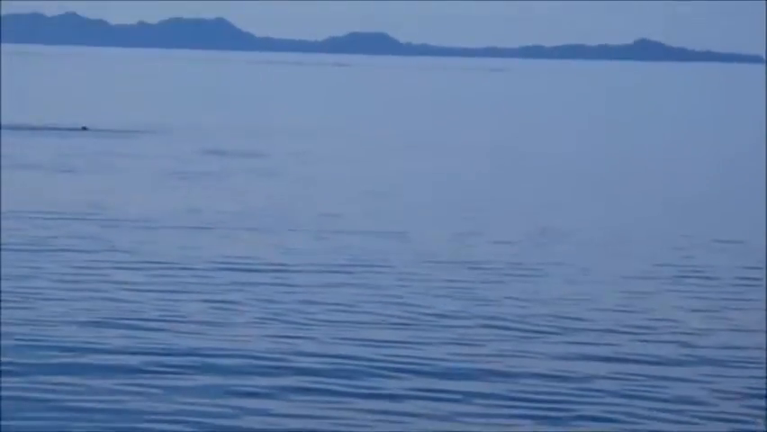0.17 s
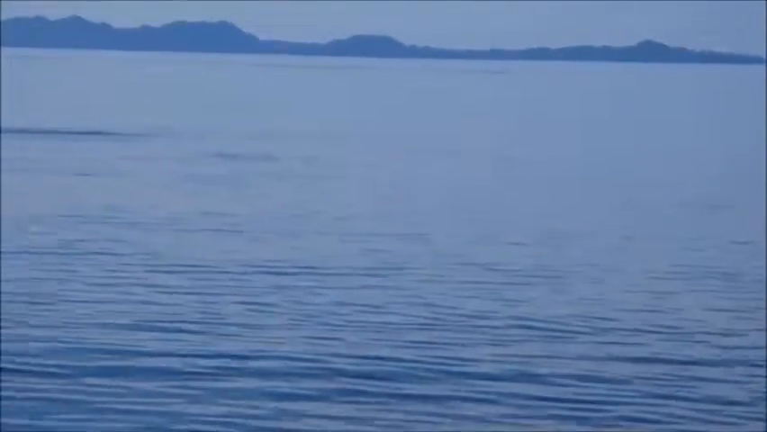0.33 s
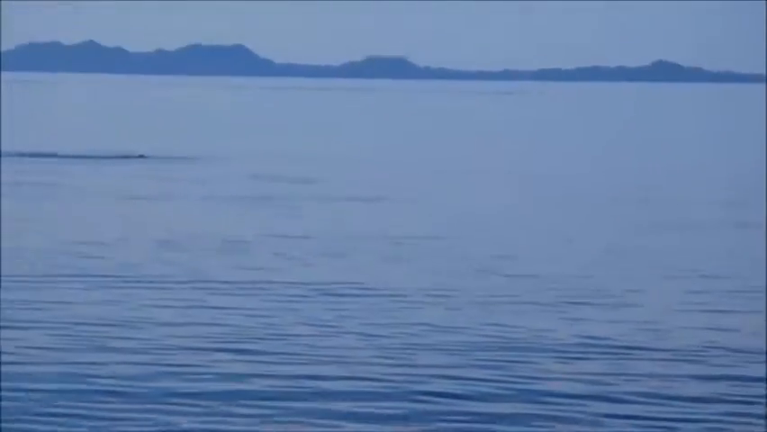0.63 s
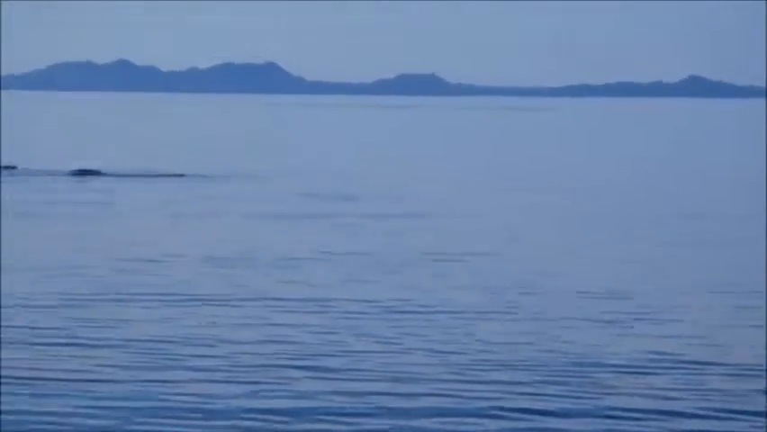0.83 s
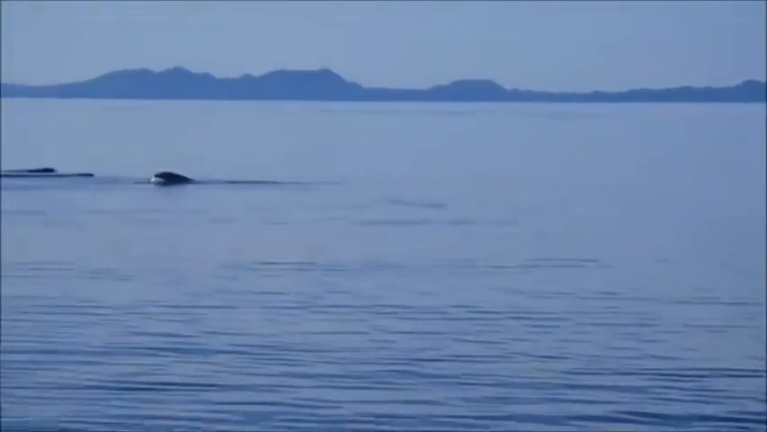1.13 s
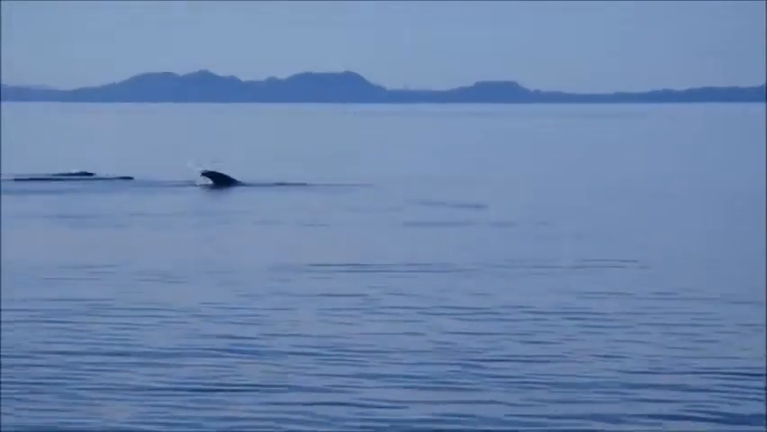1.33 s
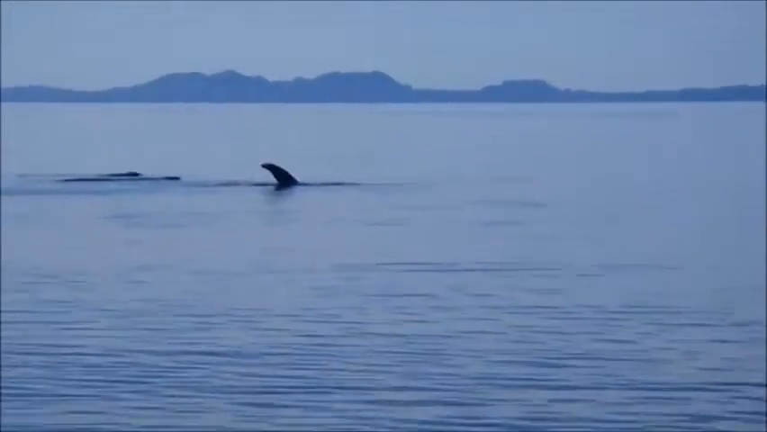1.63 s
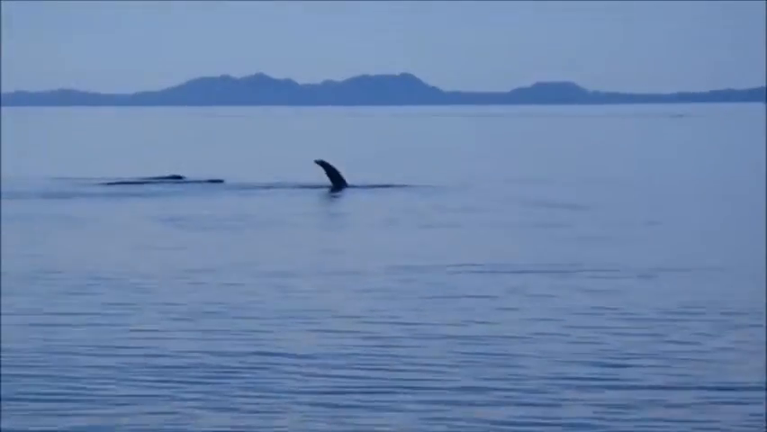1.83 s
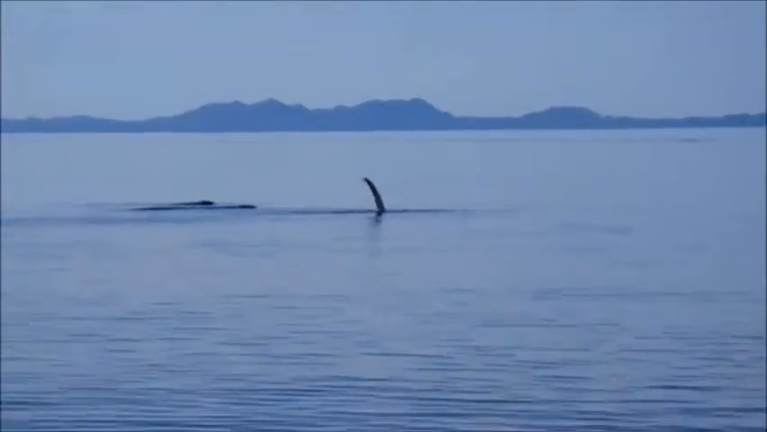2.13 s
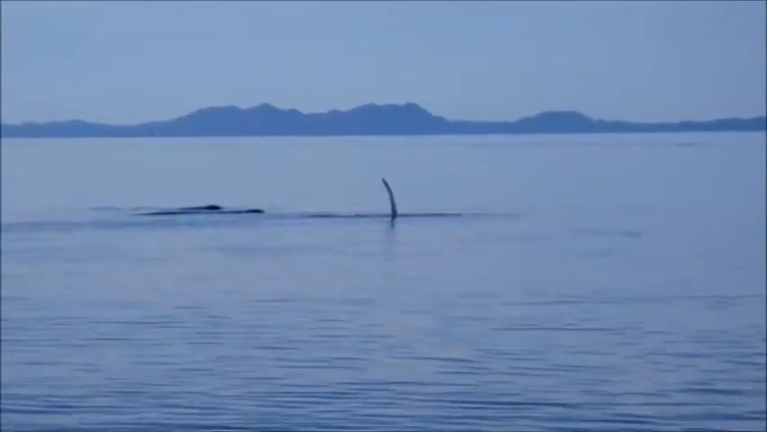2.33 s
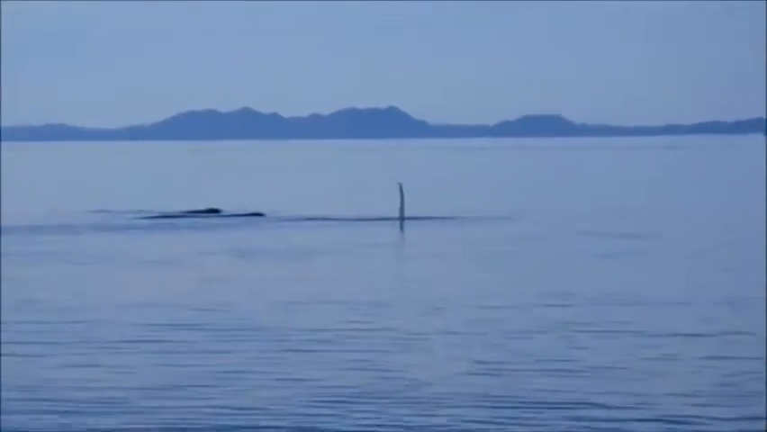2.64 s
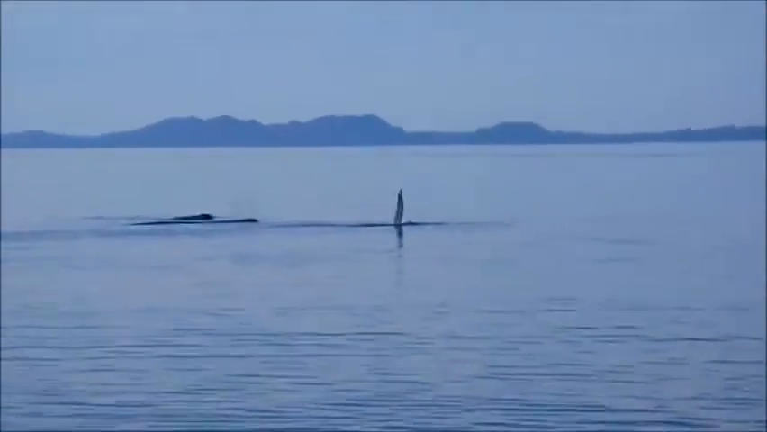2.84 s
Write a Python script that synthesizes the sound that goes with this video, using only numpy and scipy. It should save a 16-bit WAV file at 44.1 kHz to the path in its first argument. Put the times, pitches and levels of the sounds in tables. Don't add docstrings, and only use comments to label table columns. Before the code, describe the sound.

A boat's diesel engine drones low and steady through the hull, with cooling water hissing overboard; wind buffets the microphone early, and a distant whale blows softly at the start and again near the end.

```python
import sys
import numpy as np
from scipy import signal
from scipy.fft import rfft, irfft
from scipy.io import wavfile
from scipy.ndimage import uniform_filter1d, map_coordinates

SR = 44100
rng = np.random.default_rng(int(sys.argv[2]) if len(sys.argv) > 2 else 0)


def materialize(psi):
    bounded = np.clip(np.atleast_2d(psi).T, -1, 1)
    quanta = np.round(bounded * 32767).astype(np.int16)
    wavfile.write(sys.argv[1], SR, quanta)


def attenuation_scalar(level_db):
    decades = np.asarray(level_db, float) / 20
    return 10 ** decades


N = 131859


def curve(table, t):
    return np.interp(t, *np.array(table, float).T)


def level(x, db):
    return x * attenuation_scalar(db) / np.sqrt(np.mean(x ** 2))


def colour(x, shape):
    hz, db = np.array(shape, float).T
    f = np.arange(len(x) // 2 + 1) * SR / len(x) + 1
    octaves_outside = np.log2(np.maximum(hz[0] / f, 1) * np.maximum(f / hz[-1], 1))
    gain_db = np.interp(np.log(f), np.log(hz), db) - 13.7 * octaves_outside
    return irfft(rfft(x) * attenuation_scalar(gain_db), len(x))


def band(x, hz, width_hz):
    return signal.lfilter(*signal.iirpeak(hz, hz / width_hz, fs=SR), x)


def walk(rate):
    hold = int(SR / rate)
    steps = np.repeat(rng.standard_normal(99), hold)
    return 1.32 * uniform_filter1d(uniform_filter1d(steps, hold), hold)[:N]


# (multiple of the cycle [-], rms level [dB])
FIRING_ORDERS = [(6, -34.3), (9, -44), (12, -35.7), (15, -54), (18, -53)]


def firing_orders(phase):
    lag_rad, start_rad, flip_order = 0.18, 2.2, 13
    out = 0
    for order, db in FIRING_ORDERS:
        flip = np.pi * (order > flip_order)
        tone = np.cos(order * (phase - lag_rad) + start_rad + flip)
        out = out + attenuation_scalar(db + 0.74 * walk(12)) * tone
    return np.sqrt(2) * out


# (multiple of the cycle [-], rms level [dB])
GEAR_ORDERS = [(8, -57), (10, -67), (11, -50.5), (13, -62), (17, -60), (20, -60), (21, -64), (22, -59),
               (23, -58), (30, -59.5), (36, -57.5), (39, -54), (60, -66.5), (62, -59), (68, -67.5),
               (74, -63), (89, -64.5), (96, -64.5), (147, -67.5)]


def gear_orders(phase):
    slack_rad, wobble_db = 0.0053, 2.5
    out = 0
    for order, db in GEAR_ORDERS:
        strength = attenuation_scalar(db + wobble_db * walk(5.93))
        loose_phase = phase + slack_rad * walk(9.2)
        out = out + strength * np.cos(order * loose_phase + 7 * rng.random())
    return np.sqrt(2) * out


# (frequency [Hz], level [dB])
CLATTER_SPECTRUM = [(110, -31), (200, -0.5), (350, -2), (450, -7), (850, -6), (1300, -9.5), (1700, -14.5),
                    (3000, -43)]


def clatter(phase, cycle_hz):
    size = int(SR / cycle_hz)
    loop = level(colour(rng.standard_normal(size), CLATTER_SPECTRUM), -49.5)
    position = phase / (2 * np.pi) * size % size
    return map_coordinates(loop, [position], mode="grid-wrap")


# (frequency [Hz], level [dB])
ROAR_SPECTRUM = [(25, 0.5), (60, 1.5), (200, -7), (350, -7.5), (450, -13), (900, -14.5), (1400, -16.5),
                 (2500, -21)]


def roar(gate):
    swell = attenuation_scalar(0.7 * walk(8.2))
    return level(colour(rng.standard_normal(N) * gate * swell, ROAR_SPECTRUM), -43)


# (frequency [Hz], width [Hz], rms level [dB])
PANEL_MODES = [(495, 20, -62.5), (817, 67, -67.5), (1216, 43, -62), (1283, 20, -61.5), (1430, 15, -68)]


def panels(gate):
    out = 0
    for hz, width_hz, db in PANEL_MODES:
        out = out + level(band(rng.standard_normal(N) * gate, hz, width_hz), db)
    return out


# (time [s], lead of the cycle [rad])
SPEED_DRIFT = [(0, .05), (1.0, .04), (1.45, .012), (1.9, .033), (2.2, .02), (2.99, .115)]


def engine(t):
    cycle_hz = 8.84833
    phase = 2 * np.pi * cycle_hz * t + curve(SPEED_DRIFT, t)
    gate = 1 + 0.13 * (np.cos(2 * phase) + np.cos(3 * phase + 1)) / 2
    tones = firing_orders(phase) + gear_orders(phase)
    return tones + clatter(phase, cycle_hz) + roar(gate) + panels(gate)


# (frequency [Hz], width [Hz], level [dB])
SPRAY_BANDS = [(3633, 420, 0.5), (3150, 590, -6), (4330, 750, -5.5)]
# (time [s], level [dB])
WATER_FLOW = [(0, -1), (.16, 2), (.25, 0), (.5, .5), (.6, -1), (.7, 2), (.85, -1), (1.05, -1), (1.14, 2),
              (1.3, -1), (1.55, .5), (1.75, -1.5), (1.88, 1), (2.05, 1), (2.13, -1), (2.5, 0), (2.7, -1),
              (2.99, 1)]


def spray(t):
    drops_per_s, spread_db, top_db = 900, 4, 8.5
    out = 0
    for hz, width_hz, db in SPRAY_BANDS:
        size_db = np.minimum(spread_db * rng.exponential(size=N), top_db)
        drops = (rng.random(N) < drops_per_s / SR) * attenuation_scalar(size_db)
        fizz = level(drops * rng.choice([-1, 1], N), -2)
        x = rng.standard_normal(N) + fizz
        one_pass_hz = width_hz * 1.27
        x = band(band(x, hz, one_pass_hz), hz, one_pass_hz)
        out = out + x * attenuation_scalar(db + 0.8 * walk(16))
    return level(out * attenuation_scalar(curve(WATER_FLOW, t)), -50)


# (time [s], level [dB])
WIND_STRENGTH = [(0, -56), (.1, -43), (.25, -44), (.45, -48), (.7, -49), (.95, -41), (1.15, -41),
                 (1.4, -46.5), (1.7, -52), (1.9, -43.5), (2.05, -48), (2.6, -63), (2.99, -64)]
# (time [s], peak level [dB], frequency [Hz], length [cycles])
WIND_BUFFETS = [(.094, -27, 110, 1.8), (.314, -31, 110, 1.3), (.383, -22, 140, 1.0), (.563, -25, 66, 2.8),
                (.5825, -29, 190, 1.2), (.712, -33, 170, 1.2), (.842, -33, 290, 3.5),
                (.9355, -28, 165, 1.6), (1.027, -29, 58, 2.2), (1.47, -35, 150, 1.6), (1.905, -31, 60, 2.2)]


def wind(t):
    hz, width_hz = 83, 119
    x = rng.standard_normal(N) * attenuation_scalar(3.5 * walk(24.8))
    rumble = band(band(x, hz, width_hz), hz, 3 * width_hz)
    out = level(rumble, 0) * attenuation_scalar(curve(WIND_STRENGTH, t))
    for start, db, buffet_hz, cycles in WIND_BUFFETS:
        age = t - start
        window = np.exp(-(2 * age * buffet_hz / cycles) ** 2)
        out = out - attenuation_scalar(db) * window * np.sin(2 * np.pi * buffet_hz * age)
    return out


# (start [s], length [s], level [dB])
WHALE_BLOWS = [
    (0.05, 0.51, -54.5),
    (2.7, .4, -51),
]
# (frequency [Hz], level [dB])
BLOW_SPECTRUM = [(600, -14), (1500, -3), (2300, -14), (3600, -8), (4600, -14), (6000, -33)]


def whale(t):
    attack_s, release_s = 0.093, 0.3
    envelope = 0
    for start, length, db in WHALE_BLOWS:
        rise = np.clip((t - start) / attack_s, 0, 1)
        fall = np.exp(-np.maximum(t - start - length, 0) / release_s)
        envelope = envelope + attenuation_scalar(db) * rise * fall
    air = level(colour(rng.standard_normal(N), BLOW_SPECTRUM), 0)
    return envelope * air * attenuation_scalar(0.37 * walk(10))


# (time [s], peak level [dB], frequency [Hz], 60 dB decay time [s])
SMALL_RINGS = [
    (1.309, -33.5, 4800, .004),
    (2.269, -35.5, 965, .03),
    (2.255, -38, 385, .07),
    (2.422, -37, 4650, .006),
    (2.968, -41, 3050, .01),
]


def ticks(t):
    out = 0
    for start, db, hz, t60 in SMALL_RINGS:
        age = np.maximum(t - start, 0)
        envelope = np.minimum(age * 8 / t60, 1) * np.exp(-np.log(1000) * age / t60)
        out = out + attenuation_scalar(db) * envelope * 2 * np.sin(2 * np.pi * hz * age)
    return out


def scene():
    t = np.arange(N) / SR
    return (engine(t) + spray(t) + wind(t) + whale(t) + ticks(t))[None]


def low_pass(x):
    return signal.sosfilt(signal.butter(12, 14230, fs=SR, output="sos"), x)


def record(dry):
    x = dry + attenuation_scalar(-60) * rng.standard_normal(dry.shape)
    top_cut = signal.ellip(12, 0.2, 90, 14200, fs=SR, output="sos")
    mix = signal.sosfilt(top_cut, x)
    return low_pass(mix)


dry = scene()
out = record(dry)
materialize(out)
```